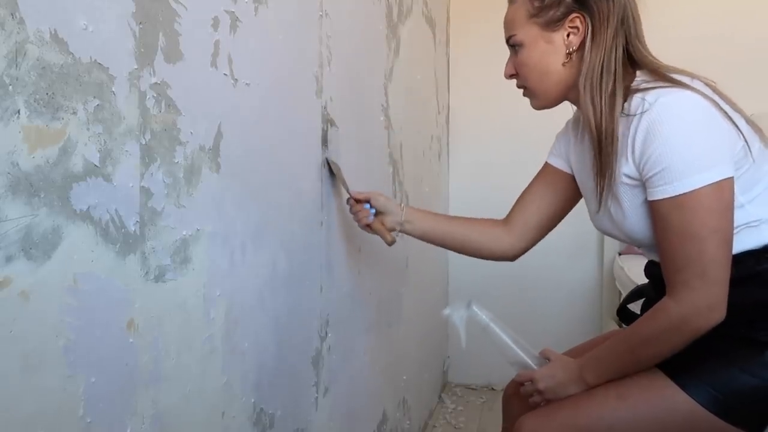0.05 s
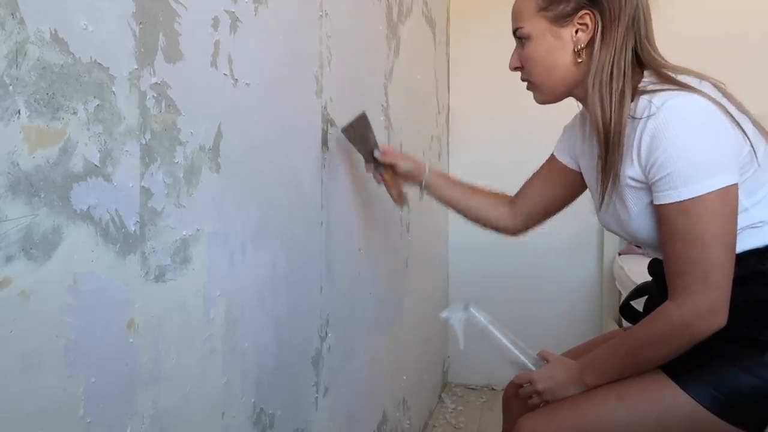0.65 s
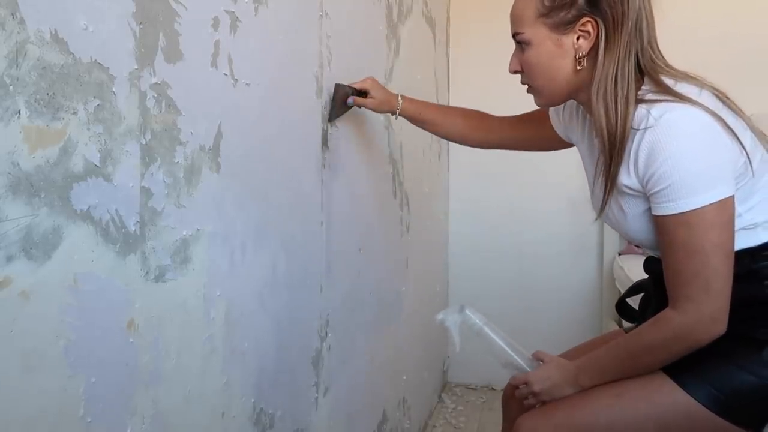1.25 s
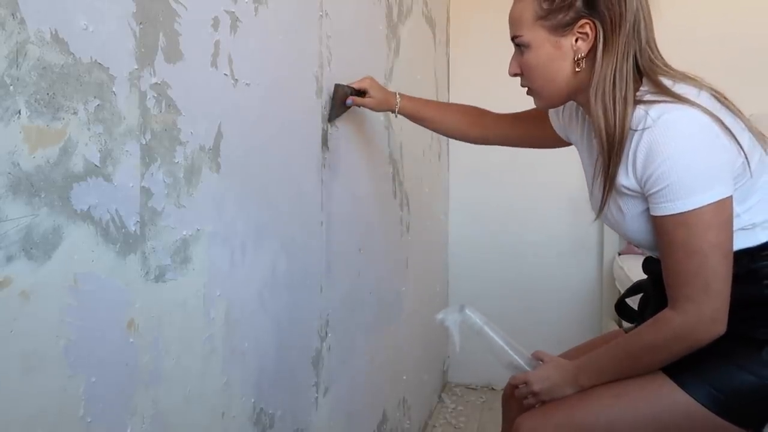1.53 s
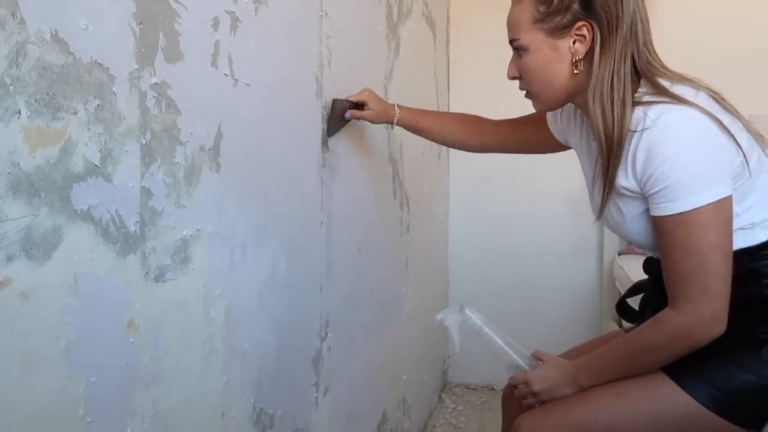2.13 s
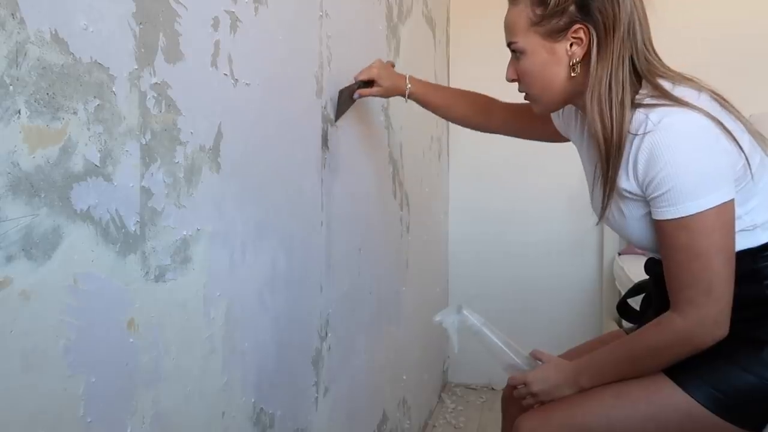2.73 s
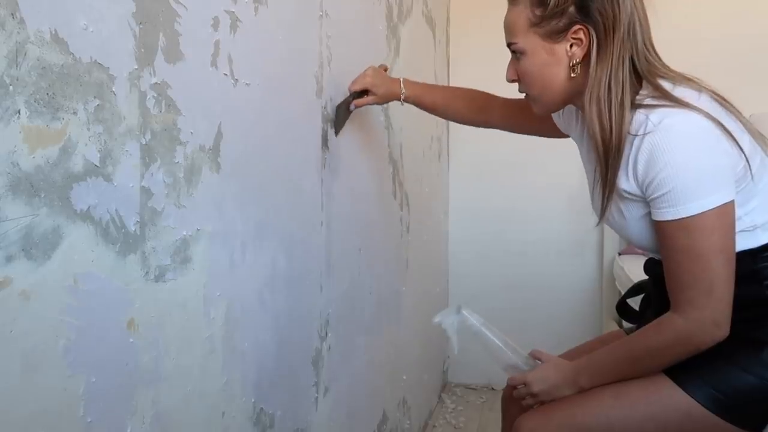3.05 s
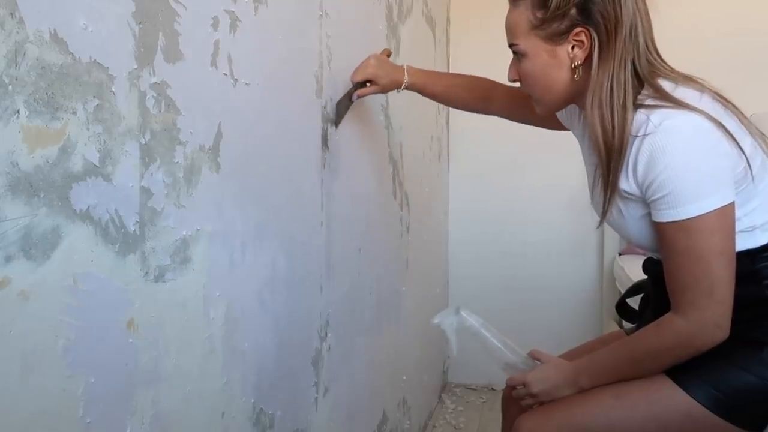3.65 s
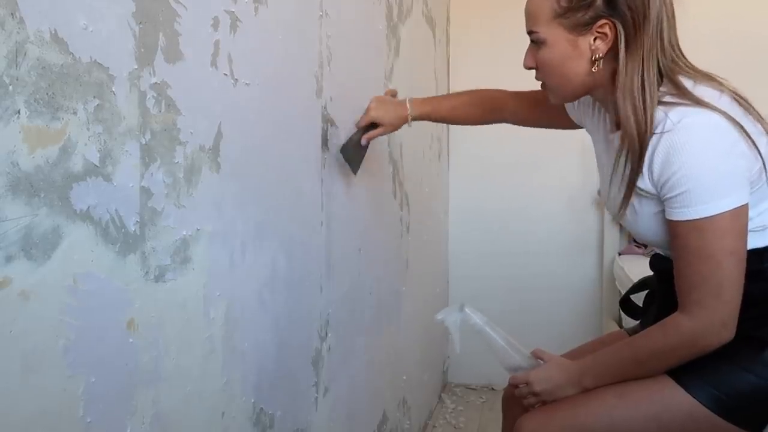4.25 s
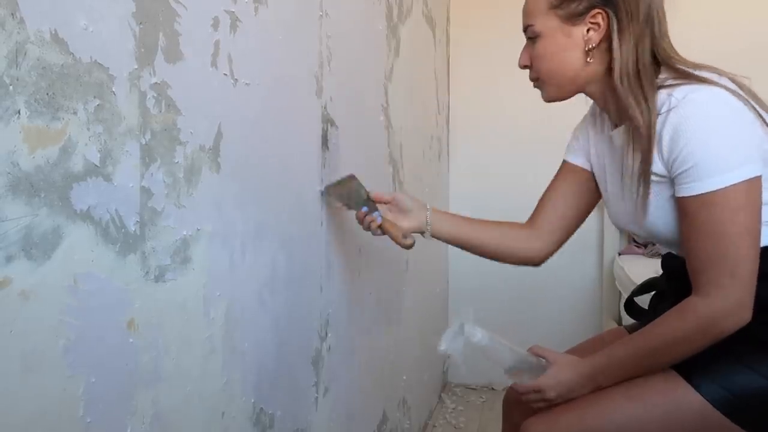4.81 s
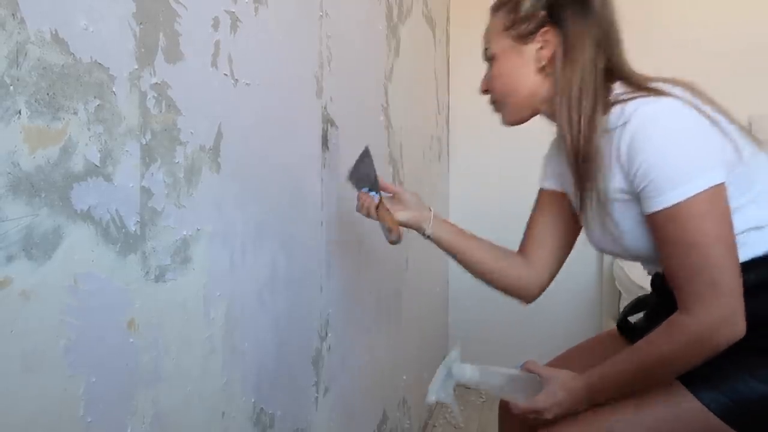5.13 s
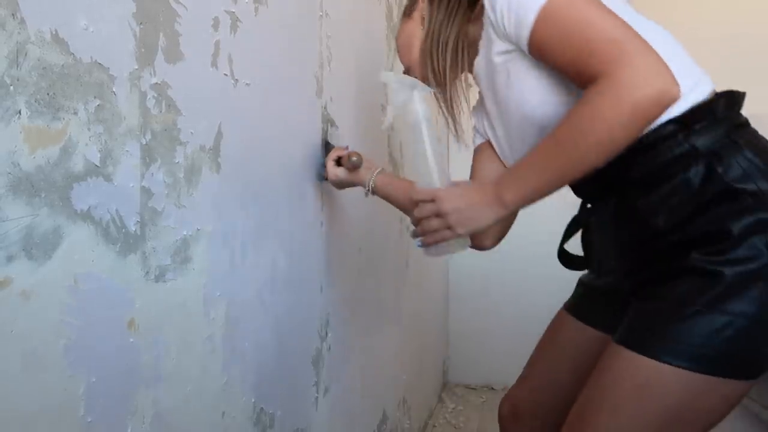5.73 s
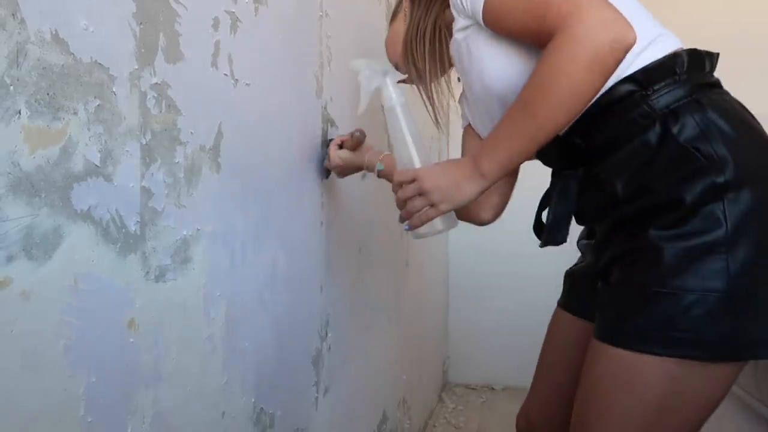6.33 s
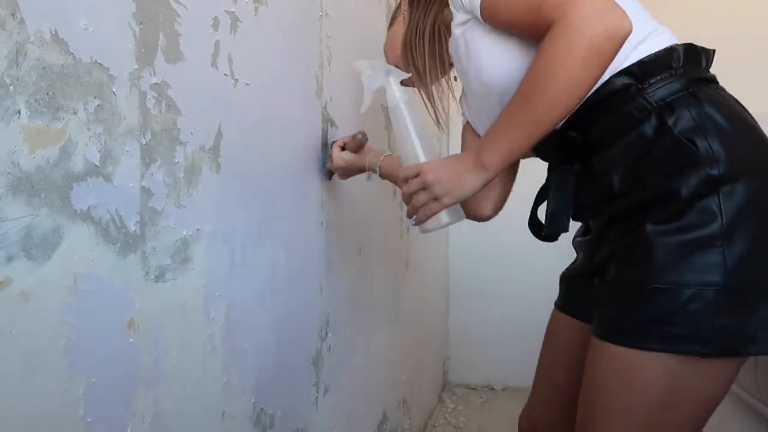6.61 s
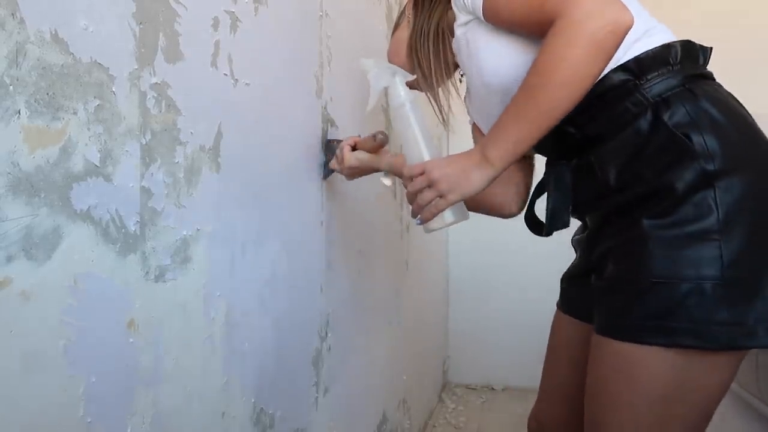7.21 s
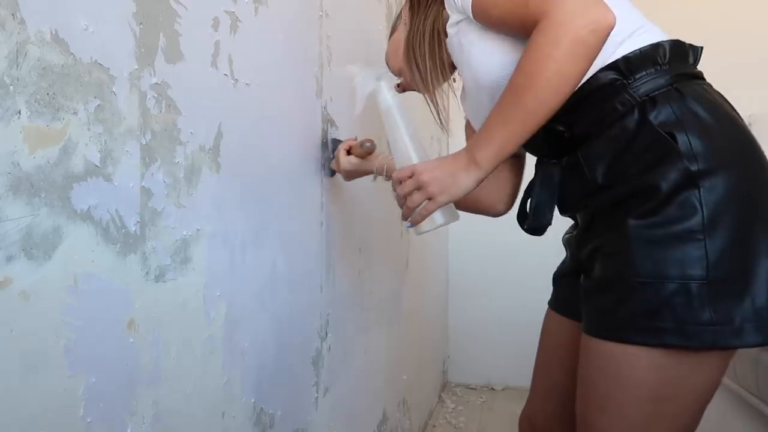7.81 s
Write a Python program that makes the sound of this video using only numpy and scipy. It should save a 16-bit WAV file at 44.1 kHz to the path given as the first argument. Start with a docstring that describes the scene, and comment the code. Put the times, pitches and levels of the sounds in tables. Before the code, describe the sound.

Light rasps and faint taps of a hand scraper on a wall, a shift of feet, then fast scraping with flakes snapping off.

```python
"""A steel hand scraper works wet paper off a plaster wall in a small, bare, faintly humming room.
A few strokes rasp as the edge breaks grains off the wall, and stick-slip makes it chirp once.
The corner then picks quietly, the blade taps and rings, and the stuck paper creaks. The worker
shifts her feet and stands, clothes rustling, and sets the blade on the wall with a clatter.
Last she scrapes hard, about eight strokes a second, with flakes snapping off under the edge."""
import sys
import numpy as np
from scipy import signal
from scipy.fft import rfft, irfft
from scipy.io import wavfile

SR = 44100
rng = np.random.default_rng(int(sys.argv[2]) if len(sys.argv) > 2 else 0)


def waveform_to_disk(signal):
    """Save audio, clipped to [-1, 1], as 16-bit WAV at the path in sys.argv[1]."""
    frames = np.transpose(np.atleast_2d(signal))
    scaled = np.clip(frames, -1, 1) * 32767
    samples = np.round(scaled).astype(np.int16)
    wavfile.write(sys.argv[1], SR, samples)


N = 346626
T = np.arange(N) / SR
TAPS = 8192
HZ = np.maximum(np.fft.rfftfreq(TAPS, 1 / SR), 1)

# Strokes of the flat edge, each bending the blade differently. Each row: time of most force and half
# length in seconds, relative level and bite in dB, low, middle and high resonance in Hz, and the
# gain of the high one in dB.
STROKES = [(0.003, 0.011, -44, -2, 1320, 2150, 3340, -10),
           (0.087, 0.042, -37.5, -5.5, 1400, 2680, 6000, -2),
           (0.238, 0.048, -39.5, -1, 1510, 1990, 3080, -13), (0.392, 0.06, -49.5, -6, 1500, 2160, 3440, -6),
           (6.075, 0.042, -33.5, -5, 1360, 2540, 3450, 4), (6.227, 0.04, -32, -2, 1330, 2510, 3590, -8),
           (6.363, 0.017, -40.5, 5, 1260, 2650, 4300, 15), (6.524, 0.025, -38, -0.5, 1120, 2460, 3950, -1),
           (6.636, 0.025, -30, -0.5, 1580, 2490, 3600, -7),
           (6.77, 0.031, -29.5, -1.5, 1020, 2510, 3450, -9), (6.878, 0.027, -29, -3, 1590, 2440, 4100, 1),
           (7.008, 0.036, -31.5, -2, 1380, 2450, 3520, -9), (7.122, 0.031, -27.5, 1, 1600, 2600, 4120, 3.5),
           (7.242, 0.027, -24, -1.5, 1350, 2340, 3490, -14),
           (7.345, 0.027, -24.5, -1, 1500, 2430, 3900, -12), (7.473, 0.03, -23, -.5, 1340, 2620, 3470, -10),
           (7.58, 0.022, -26, 1, 1490, 2300, 3800, 2), (7.712, 0.028, -31, 2, 1200, 2570, 3110, -7),
           (7.809, 0.024, -34.5, 1, 1300, 2580, 3530, 3)]
# The blade lands with a tick, rings and skids to rest. Each row: time in seconds, relative level and
# extra grit in dB, pitch in Hz, fall of the skid in seconds, relative ring level in dB.
LANDINGS = [(1.673, -54.5, -4, 1920, 0.015, -55.5), (1.789, -55, -4, 2290, 0.025, -57.5),
            (2.464, -49, 8, 2360, 0.025, -56.5), (4.521, -59, 11, 4540, .022, -73),
            (5.266, -38.5, 4, 1590, 0.03, -61), (5.684, -33, 10, 2400, 0.012, -63)]


def from_db(db):
    """Amplitude ratio of a level in decibels."""
    return 10 ** (np.asarray(db) / 20)


def rms_one(x):
    """Normalisation to unit power."""
    return x / np.sqrt(np.mean(x ** 2) + 1e-20)


def at_hz(points, hz=HZ):
    """Interpolation of a table on a log-frequency axis."""
    f, value = np.transpose(points)
    return np.interp(np.log(hz), np.log(f), value)


def peaks(resonances):
    """Resonance curves: a sum of Lorentzian peaks and dips, in dB."""
    return sum(db / (1 + (2 * (HZ - hz) / width) ** 2) for hz, width, db in resonances)


def colour(x, db):
    """Minimum-phase filtering to a spectral shape in dB; white noise keeps its level."""
    cepstrum = irfft(np.log(from_db(db)))
    cepstrum[1:TAPS // 2] *= 2
    cepstrum[TAPS // 2 + 1:] = 0
    response = irfft(np.exp(rfft(cepstrum)))
    return signal.oaconvolve(x, response / np.linalg.norm(response))[:N]


def part(x, hz, kind):
    """Zero-phase filtering: the low or high part of a sound, in phase with the whole."""
    return signal.sosfiltfilt(signal.butter(3, hz, kind, fs=SR, output="sos"), x)


def swell(s, rise, fall):
    """Force pulse that builds to 1 at time s and lets go: the samples it covers and its shape."""
    span = slice(max(int((s - 4 * rise) * SR), 0), int((s + 4 * fall) * SR))
    away = np.abs(T[span] - s) / np.where(T[span] < s, max(rise, 1e-3), max(fall, 1e-3))
    return span, np.exp(-.7 * away ** 1.89)


def grains(per_s, spread_db, smooth):
    """Shot noise: tiny random fractures of uneven size over smooth friction; rms 1."""
    friction = rng.standard_normal(N)
    onsets = np.flatnonzero(rng.random(N) < per_s / SR)
    sizes = from_db(spread_db * np.clip(friction[onsets - 1], -2, 2)) * np.sign(friction[onsets])
    return rms_one(rms_one(np.bincount(onsets, sizes, N)) + smooth * friction)


def judder(per_s, depth_db):
    """Random amplitude modulation, as in uneven stick and slip; rms 1."""
    knots = from_db(depth_db * np.clip(rng.standard_normal(N // 40), -2, 2))
    return rms_one(np.interp(T * per_s, np.arange(len(knots)), knots))


def ring(x, hz, t60):
    """Damped oscillator: a unit impulse starts a sine of height 1 that falls 60 dB in t60 seconds."""
    r, w = from_db(-60 / (t60 * SR)), 2 * np.pi * hz / SR
    return signal.lfilter([0, np.sin(w)], [1, -2 * r * np.cos(w), r * r], x + 1e-18)


def strike(hits, modes):
    """Modal superposition: each hit rings every mode with a slightly random strength."""
    s, db = np.transpose(hits)
    out = np.zeros(N)
    for hz, mode_db, t60 in modes:
        strengths = from_db(db + mode_db + 2 * rng.standard_normal(len(s)))
        out += ring(np.bincount((s * SR).astype(int), strengths, N), hz, t60)
    return out


def stereo(mid, side, width):
    """Sum and difference: the side signal, shaped by the width curve, sets left apart from right."""
    width_db = at_hz(width)
    side = colour(side, width_db) * np.sqrt(np.mean(from_db(width_db) ** 2))
    return np.array([mid + side, mid - side])


def background():
    """Ambient noise: still indoor air, with mains hum and a faint electric whine that waver in level."""
    # Each row: frequency in Hz, relative spectral density of the air in dB.
    air_spectrum = [(12, -51), (20, -17), (49, -0.5), (107, -3.5), (154, -7.5), (187, -6.5), (262, -6.5),
                    (459, -9), (499, -14), (678, -14.5), (1290, -17.5), (2390, -20.5), (6910, -30.5),
                    (12800, -40.5), (16000, -54)]
    # Each row: frequency in Hz, side minus mid level in dB.
    air_width = [(60, -26), (110, -11), (200, -2.5), (380, 0), (700, 1.5), (1290, 0.5), (2380, 0.5),
                 (4400, 3), (8120, -2), (15000, 6)]
    # Each row: frequency of an electric tone in Hz, level in dB.
    tones = [(101, -74), (2145, -92), (2751, -107), (13001, -84), (13028, -88)]
    mid, side = [colour(rng.standard_normal(N), at_hz(air_spectrum)) for _ in range(2)]
    hum = sum(from_db(db) * np.sqrt(2) * np.sin(2 * np.pi * (hz * T + rng.random())) for hz, db in tones)
    return from_db(-54) * stereo(mid, side, air_width) + hum * judder(per_s=12, depth_db=6.0)


def touches(middle_db=-1, pick_bite_db=-1.5, skid_bite_db=2, skid_rise_s=0.0065):
    """Sliding contacts: the force pulse and blade resonances of every stroke, pick and skid."""
    # The corner picks under the paper. Each row: time and half length in seconds, relative level in dB.
    corner_picks = [(0.816, 0.016, -58.5), (0.99, 0.081, -70), (1.2, 0.036, -66), (2.6, 0.042, -63.5),
                    (2.773, 0.035, -54), (2.881, 0.033, -48), (3.09, 0.024, -63.5), (3.223, 0.073, -62.5),
                    (3.499, 0.022, -57.5), (3.604, 0.024, -52), (3.756, 0.084, -64), (4.134, 0.048, -48.5)]
    strokes = [(s, half, half, db, bite_db, 0, [(low, 0), (middle, middle_db), (high, high_db)])
               for s, half, db, bite_db, low, middle, high, high_db in STROKES]
    picks = [(s, half, half, db, pick_bite_db, 0, []) for s, half, db in corner_picks]
    skids = [(s + skid_rise_s, skid_rise_s, fall, db, skid_bite_db, grit_db, [(hz, middle_db)])
             for s, db, grit_db, hz, fall, _ in LANDINGS]
    return strokes + picks + skids


def wandering(x, per_s, depth_db):
    """Moving excitation: the contact point roams along the edge, so each band swells on its own."""
    out = 0
    for hz in np.geomspace(1300, 4200, 4):
        low = part(x, hz, "low")
        out = out + low * judder(per_s, depth_db)
        x = x - low
    return rms_one(out + x)


def scraping(bend_q=19.7, grit_even_db=-27.5, grit_slope=0.39):
    """Friction noise: grains breaking under the edge drive the resonances of blade and wall."""
    # Spectra of the rasp and the drumming wall. Each row: frequency in Hz, relative density in dB.
    rasp_spectrum = [(350, -56), (600, -24), (758, -18.5), (944, -18), (984, -0.5), (1330, 2), (1550, 1),
                     (1750, -4.5), (2500, 0), (2800, -6.5), (3530, -6), (6120, -18), (8160, -29),
                     (13400, -38), (16000, -43)]
    wall_spectrum = [(70, -11), (150, -4), (220, 2), (300, 2), (400, -0.5), (470, 2), (540, -12),
                     (630, -13), (780, -11), (980, -2), (1200, -14), (1800, -45.5)]
    # Resonances with the flat edge on the wall, and the freer ones with only the corner touching.
    # Each row: frequency and width in Hz, gain in dB.
    flat_peaks = [(760, 220, -7), (1005, 29, 5), (1095, 7, 3.5), (1128, 21, 5.5), (1270, 46, 1.5),
                  (1410, 13, -0.5), (1560, 89, 6.5), (1660, 69, -3), (2040, 16, 4), (2370, 67, 0.5),
                  (2370, 79, 1.5), (2940, 220, 2.5), (6650, 100, -0.5)]
    corner_peaks = [(1191, 90, 11.5), (1450, 37, 7.5), (1560, 390, -2.5), (1900, 75, 11), (2030, 1200, 3.5),
                    (2067, 180, 11.5), (2450, 380, -0.5), (2767, 140, 17), (3680, 790, 2), (4000, 220, 2.5),
                    (4590, 41, 7), (6100, 130, 2)]
    # How blade meets wall. Each row: time in seconds, tilt (0 flat, 1 corner), relative drumming in dB.
    grip = [(0.45, 0.28, -36), (1.2, 1, -50), (4.4, 0.99, -24.5), (5.1, 0.19, -20), (5.8, 0.2, -29),
            (6.15, 0.18, -24), (6.8, 0.036, -28), (7.45, 0.084, -29.5), (7.8, 0.19, -25.5)]
    times, tilts, drum_db = np.transpose(grip)
    corner = np.clip(np.interp(T, times, tilts), 0, 1)
    slips = judder(per_s=280, depth_db=1.5)
    grit = grains(per_s=1700, spread_db=2.5, smooth=0.44)
    fractures = slips * wandering(grit, per_s=110, depth_db=3.5)
    low, high = part(fractures, 1430, "low"), part(fractures, 4820, "high")
    middle = fractures - low - high
    force, drive = np.zeros((2, N))
    for s, rise, fall, db, bite_db, extra_db, resonances in touches():
        span, push = swell(s, rise, fall)
        # A deeper bite adds body; a lighter touch skims more fine grit.
        grit_db = extra_db + grit_slope * (grit_even_db - db)
        rasp = from_db(bite_db) * low[span] + middle[span] + from_db(grit_db) * high[span]
        bent = sum(from_db(ring_db) * signal.lfilter(*signal.iirpeak(hz, bend_q, fs=SR), rasp)
                   for hz, ring_db in resonances)
        drive[span] += from_db(db) * push * (rasp + bent)
        force[span] += from_db(db) * push
    flat = colour(drive * (1 - corner), at_hz(rasp_spectrum) + peaks(flat_peaks))
    picked = colour(drive * corner, at_hz(rasp_spectrum) + peaks(corner_peaks))
    # The wall's low drumming grows more slowly than the rasp and has one hollow resonance.
    drumming = force ** 0.74 * np.interp(T, times, from_db(drum_db))
    hollow_wall = at_hz(wall_spectrum) + peaks([(326, 78, 2.9)])
    drum = colour(drumming * slips * rng.standard_normal(N), hollow_wall)
    return from_db(-3.5) * flat + from_db(1.23) * picked + from_db(5.0) * drum


def tearing(stroke_share_db=-29.5):
    """Fibre fracture: paper parts in sparse, bright grains, in scraps and a little on every stroke."""
    # Scraps tear away. Each row: time, rise and fall in seconds, level in dB.
    tears = [(0.085, 0.022, 0.021, -62), (2.872, 0.023, 0.026, -57), (3.078, .01, .012, -64),
             (3.61, 0.024, .015, -61), (3.722, 0.017, .012, -61), (3.78, 0.0079, 0.017, -54.5),
             (4.12, 0.072, 0.045, -63.5), (6.096, 0.007, 0.0073, -61), (6.346, .002, .012, -54),
             (7.158, .003, 0.021, -44)]
    # Each row: frequency in Hz, relative spectral density in dB.
    tear_spectrum = [(1500, -13), (3500, 1), (5500, 1), (8000, -5), (10000, -2), (12000, -12), (14500, -7),
                     (16000, -22)]
    crackles = [(s, half, half, db + stroke_share_db) for s, half, db, *_ in STROKES]
    pull = np.zeros(N)
    for s, rise, fall, db in tears + crackles:
        span, shape = swell(s, rise, fall)
        pull[span] += from_db(db) * shape
    return colour(pull * grains(per_s=770, spread_db=3.0, smooth=0.25), at_hz(tear_spectrum))


def snaps(crack=0.065, crumble=0.13, crumble_s=0.00066, tick_db=10.5, tick_cycles=7):
    """Brittle fracture: a flake cracks, crumbles and rings briefly; the landing blade ticks likewise."""
    # Flakes snap off the wall or underfoot. Each row: time in seconds, peak in dB, pitch in Hz,
    # cycles of ringing.
    flakes = [(0.0346, -26.5, 4000, 7.6), (0.325, -24.5, 3900, 3.4), (2.727, -44.5, 4800, 11),
              (5.1113, -21.5, 1360, 3.4), (5.12, -16.5, 1900, 16), (5.982, -30, 2370, 18),
              (6.012, -29, 2450, 9), (6.043, -30, 1550, 6), (6.06, -21, 2460, 9.9), (6.194, -22, 2500, 9),
              (6.345, -30, 2470, 4), (6.3577, -19.5, 3260, 2.5), (6.602, -33, 1560, 10),
              (6.617, -30, 1450, 10), (6.633, -18, 1510, 15), (6.7539, -21.5, 1130, 10),
              (6.8674, -18, 2050, 5.9), (7.047, -23.5, 1420, 12), (7.1036, -19, 1550, 8.1),
              (7.128, -15, 1540, 5.5), (7.1536, -13, 3670, 7.5), (7.154, -29, 13400, 6.4),
              (7.224, -19, 1330, 10), (7.3213, -13, 1570, 8.5), (7.4483, -10, 1900, 5.2),
              (7.5638, -15, 1490, 22), (7.708, -28, 2480, 7.9)]
    ticks = [(s, db + tick_db, hz, tick_cycles) for s, db, _, hz, _, _ in LANDINGS]
    out, t = np.zeros(N + SR), T[:SR // 50]
    for s, db, hz, cycles in flakes + ticks:
        band = signal.butter(3, [hz / 1.44, min(1.76 * hz, .45 * SR)], "band", fs=SR, output="sos")
        kick = (t == 0) + crumble * rng.standard_normal(len(t)) * np.exp(-t / crumble_s)
        snap = signal.sosfilt(band, ring(kick, hz, cycles / hz) + crack * kick)
        at = int(s * SR)
        out[at:at + len(t)] += from_db(db) * snap / np.abs(snap).max()
    return out[:N]


def chirp(start_s=.0664, first_gap_s=.0037, slowing=1.35, loss_db=1.2, count=7):
    """Stick-slip: the edge skips ever more slowly and weakly, and each slip rings the steel."""
    # Each row: mode frequency in Hz, relative level in dB, 60 dB decay time in seconds.
    modes = [(2352, 2, 0.029), (2640, -2.5, 0.05), (5840, -19, 0.031)]
    slips = [(start_s + first_gap_s * k ** slowing, -25 - loss_db * k) for k in range(count)]
    return from_db(-1.5) * part(strike(slips, modes), 1700, "high")


def feet(sole_hz=486, sole_q=8.3):
    """Impact and friction: heels and weight drive the floor while soles rub and crush fallen scraps."""
    # Shoes shift and land. Each row: time, rise and fall in seconds, relative thud, crunch and rub in dB.
    steps = [(0.419, 0.0058, 0.025, -55.5, -52, -69), (4.845, 0.021, 0.0088, -46, -70, -41.5),
             (4.897, 0.022, 0.021, -39, -50.5, -49), (5.072, 0.0097, 0.017, -45, -49.5, -40.5),
             (5.121, 0.01, 0.042, -39.5, -29.5, -50), (5.142, 0.0086, 0.0048, -35.5, -42, -52),
             (5.182, 0.014, 0.036, -38.5, -44, -49), (5.614, 0.006, 0.013, -49.5, -75, -75)]
    # Spectra of the thud and the crushed debris. Each row: frequency in Hz, relative density in dB.
    thud_spectrum = [(50, -36.5), (90, -12), (140, -3), (200, -6), (280, -6.5), (360, -1), (470, -7),
                     (600, -8), (800, -28), (1500, -50.5)]
    crunch_spectrum = [(260, -50), (450, 1.5), (835, -2), (978, -2), (1110, -7), (1300, -2.5), (1920, 1.5),
                       (2290, -6.5), (3620, -12), (14000, -57.5)]
    # Hollow resonances of the floor. Each row: frequency and width in Hz, gain in dB.
    floor_peaks = [(231, 92, 7.5), (364, 33, 2)]
    # Heels come down. Each row: time in seconds, relative level in dB.
    heels = [(4.897, -35), (5.134, -22)]
    # Each row: mode frequency in Hz, relative level in dB, 60 dB decay time in seconds.
    floor_modes = [(135, -18, 0.19), (242, -18, 0.074), (351.5, 0.5, 0.096)]
    thud, crunch, rub = np.zeros((3, N))
    for s, rise, fall, thud_db, crunch_db, rub_db in steps:
        span, weight = swell(s, rise, fall)
        thud[span] += weight * from_db(thud_db)
        crunch[span] += weight * from_db(crunch_db)
        rub[span] += weight * from_db(rub_db)
    floor = colour(thud * rng.standard_normal(N), at_hz(thud_spectrum) + peaks(floor_peaks))
    scraps = colour(crunch * grains(per_s=3700, spread_db=0.5, smooth=0.63), at_hz(crunch_spectrum))
    friction = part(rng.standard_normal(N), 540, "low")
    grunt = signal.lfilter(*signal.iirpeak(sole_hz, sole_q, fs=SR), friction)
    boom = part(strike(heels, floor_modes), 700, "low")
    return from_db(4.5) * floor + scraps + rub * rms_one(grunt) + boom


def blade_ring():
    """Free vibration: the blade rings on after each landing."""
    # Each row: mode frequency in Hz, relative level in dB, 60 dB decay time in seconds.
    modes = [(1200, -4, .16), (1900, -6, 0.17), (2080, -4.5, .25), (2400, -8, .12), (2730, -4, 0.35),
             (3700, -9, .12), (4450, -7, .12), (5040, -5, .1)]
    return strike([(s, ring_db) for s, *_, ring_db in LANDINGS], modes)


def creak(start_s=3.12, gap_s=.04, jitter_s=.004, spread_db=2.5, count=8):
    """Stick-slip: the stuck paper gives way under the corner in slow, faint, uneven ticks."""
    # Each row: mode frequency in Hz, relative level in dB, 60 dB decay time in seconds.
    modes = [(3200, 0, 0.016), (4800, -2, .011)]
    late, louder = rng.standard_normal((count, 2)).T
    times = start_s + gap_s * np.arange(count) + jitter_s * late
    ticks = np.transpose([times, -54 + spread_db * louder])
    return part(strike(ticks, modes), 2000, "high")


def clothes():
    """Friction noise: fabric rubs on itself in fine grains as the worker shifts and stands."""
    # Each row: time in seconds, level of the rustle in dB.
    rustle = [(4.601, -72), (4.89, -47.5), (5.0, -65.5), (5.35, -55), (5.65, -56.5), (6.0, -63)]
    # Each row: frequency in Hz, relative spectral density in dB.
    cloth_spectrum = [(400, -15), (1000, -2), (1400, -1), (2400, 1), (3500, -5.5), (6000, -15), (9000, -21),
                      (15000, -34)]
    s, db = np.transpose(rustle)
    level = from_db(np.interp(T, s, db, left=-np.inf, right=-np.inf))
    return colour(level * grains(per_s=2500, spread_db=-1.0, smooth=0.31), at_hz(cloth_spectrum))


def clatter():
    """Repeated impact: the steel knocks on the wall in quick succession, exciting its modes."""
    # Each row: time in seconds, relative level in dB.
    knocks = [(5.681, -31), (5.687, -26.5), (5.6905, -27.5), (5.6955, -25)]
    # Each row: mode frequency in Hz, relative level in dB, 60 dB decay time in seconds.
    modes = [(1220, 16.5, 0.011), (1820, -5, 0.014), (2500, 11, 0.03), (2790, 5, .09), (3440, 20, 0.011),
             (4900, 7, 0.024), (6000, -6, 0.16), (9680, -6, 0.12), (12320, -4, 0.12), (13400, -16, .1)]
    return from_db(-24.5) * strike(knocks, modes)


def wall_thumps():
    """Impulse excitation: the edge catches on a ridge and rings the plaster's low, damped modes."""
    # Each row: time in seconds, relative level in dB.
    catches = [(6.754, -31.5), (7.564, -42)]
    # Each row: mode frequency in Hz, relative level in dB, 60 dB decay time in seconds.
    modes = [(155, -8, 0.045), (310, 1.5, 0.026), (685, -4.5, 0.0068)]
    return strike(catches, modes)


def room_response(early_db, early_s, tail_db, build_s=0.0063):
    """Reverberation: scatter from the near walls, then a diffuse tail that dies band by band."""
    # Each row: frequency in Hz, reverberation time in seconds.
    room_t60 = [(100, 0.78), (400, 0.56), (1500, 0.35), (5000, 0.5), (15000, 0.39)]
    t = T[:SR * 3 // 4]
    hz, white = np.fft.rfftfreq(len(t), 1 / SR), rfft(rng.standard_normal(len(t)))
    edges = np.geomspace(20, SR / 2, 11)
    tail = np.zeros(len(t))
    for low, high in zip(edges, edges[1:]):
        band = irfft(white * ((hz >= low) & (hz < high)), len(t))
        tail += band * from_db(-60 * t / at_hz(room_t60, np.sqrt(low * high)))
    tail *= np.clip(t / build_s, 0, 1)
    early = rng.standard_normal(len(t)) * np.exp(-t / early_s) * (t > .002)
    return (from_db(tail_db) * tail / np.linalg.norm(tail)
            + from_db(early_db) * early / np.linalg.norm(early))


def scene():
    """Superposition: blade, paper, feet and clothes add to their reflections and the background."""
    # First reflections. Each row: delay in seconds, gain in dB.
    reflections = [(.0074, -21.5), (0.0124, -18), (0.0156, -13.5)]
    # The diffuse sound is widest in the treble. Each row: frequency in Hz, relative side gain in dB.
    width = [(60, -21), (110, -35), (200, -42), (380, -15), (700, -55), (1290, -13.5), (2380, -17),
             (4400, -1), (8120, 7.5), (15000, 10)]
    struck = clatter() + chirp() + blade_ring() + wall_thumps()
    direct = scraping() + snaps() + struck + tearing() + creak() + feet() + clothes()
    walls = sum(from_db(db) * np.pad(direct, (int(delay * SR), 0))[:N] for delay, db in reflections)
    responses = [room_response(early_db=-10.0, early_s=0.0012, tail_db=-7) for _ in range(2)]
    mid, side = [signal.oaconvolve(direct, response)[:N] for response in responses]
    return stereo(direct + walls + mid, from_db(-1.0) * side, width) + background()


def record(dry):
    """Band limiting: an elliptic low-pass filter cuts the top steeply."""
    cutoff_hz = 15700
    return signal.sosfilt(signal.ellip(10, .2, 80, cutoff_hz, fs=SR, output="sos"), dry)


dry = scene()
out = record(dry)
waveform_to_disk(out)
```